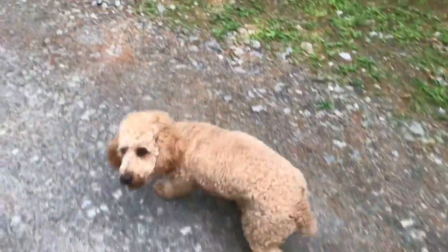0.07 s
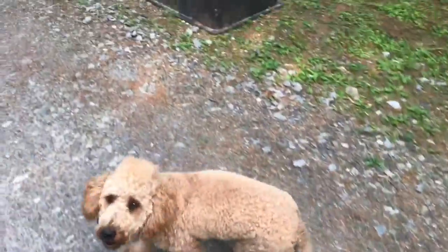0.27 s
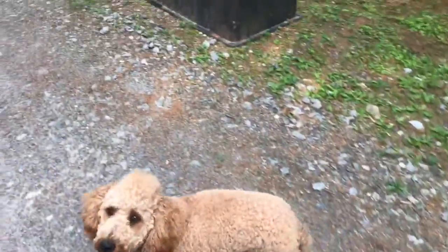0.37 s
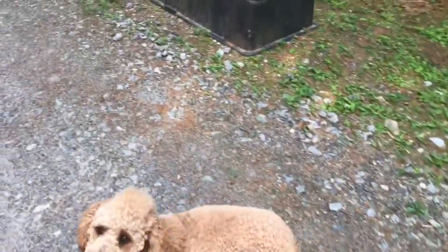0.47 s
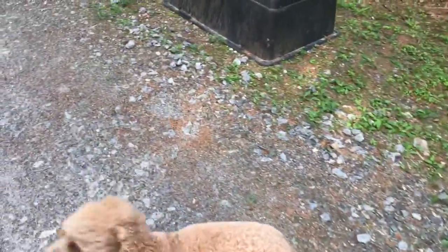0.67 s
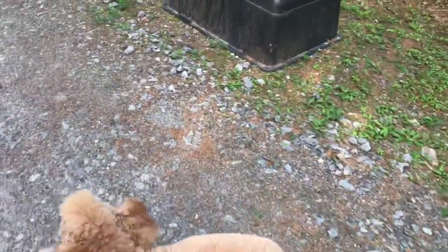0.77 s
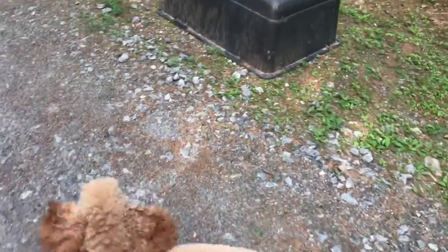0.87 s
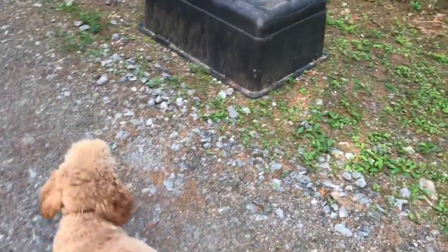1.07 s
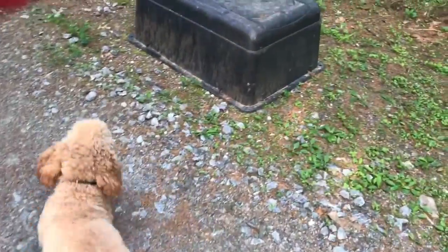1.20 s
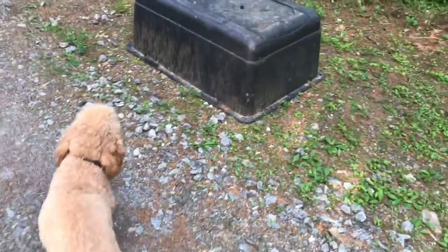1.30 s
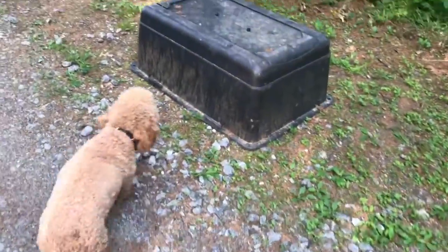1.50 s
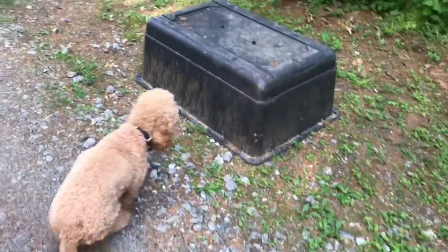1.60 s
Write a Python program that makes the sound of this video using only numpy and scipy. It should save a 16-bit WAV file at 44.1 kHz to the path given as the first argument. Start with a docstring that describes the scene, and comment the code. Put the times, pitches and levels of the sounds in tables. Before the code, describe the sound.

Slow footsteps crunch on gravel, stones knocking and grit hissing, while a small dog's metal collar tags jingle irregularly. The middle step has the sharpest stone knock. Quiet outdoor place, close, dry, mono microphone with faint low rumble.

```python
"""Three slow steps on a gravel path, beside a small dog whose three metal collar tags clink.
Soles crunch small stones (dense grains in broad bands) and knock large ones (cosine pulses plus rattle).
Stones settle and dragged grit hisses (coloured grains); tags ring as damped sine modes.
Under it lie a low rumble and faint outdoor air, both coloured noise."""
import sys
import numpy as np
from scipy import signal
from scipy.fft import rfft, irfft
from scipy.io import wavfile

SR = 44100
rng = np.random.default_rng(int(sys.argv[2]) if len(sys.argv) > 2 else 0)


def master(y):
    """Save y as 16-bit WAV."""
    cut = np.clip(np.atleast_2d(y).T, -1, 1)
    pcm = np.round(cut * 32767)  # scale
    wavfile.write(sys.argv[1], SR, pcm.astype(np.int16))


N = 72765  # samples, 1.65 s


def amp(db):
    """Decibels to linear gain."""
    return 10 ** (np.asarray(db) / 20)


def noise():
    """White Gaussian noise."""
    return rng.standard_normal(N)


def colour(x, points):
    """Shape the spectrum by (frequency [Hz], level [dB]) points; scale to rms 1."""
    hz, db = np.array(points, float).T
    log_hz = np.log(np.maximum(np.fft.rfftfreq(N, 1 / SR), 1))
    below = np.maximum(np.log(hz[0]) - log_hz, 0)
    above = np.maximum(log_hz - np.log(hz[-1]), 0)
    # 77 dB per factor e in frequency beyond the end points
    gain_db = np.interp(log_hz, np.log(hz), db) - 77 * (below + above)
    y = irfft(rfft(x) * amp(gain_db), N)
    return y / y.std()


def band(x, hz, width):
    """Broad resonance, width relative to its centre; scaled to rms 1."""
    edge = np.sqrt(1 + width ** 2 / 4) + width / 2
    edges_hz = [hz / edge, min(hz * edge, 0.45 * SR)]
    y = signal.sosfilt(signal.butter(2, edges_hz, "band", fs=SR, output="sos"), x)
    return y / y.std()


def grains(per_s, spread_db):
    """Random one-sample impacts of either sign and uneven size."""
    hits = rng.random(N) < per_s / SR
    signs = rng.choice([-1, 1], N)
    sizes = amp(spread_db * np.minimum(rng.exponential(size=N), 4))
    return hits * signs * sizes


def fade(age, tau_s):
    """Sudden start, exponential decay."""
    return (age >= 0) * np.exp(-np.maximum(age, 0) / tau_s)


def curve(t, points):
    """Gain along (time [s], level [dB]) points, linear in dB."""
    return amp(np.interp(t, *np.array(points).T))


# rumble spectrum: (frequency [Hz], relative level [dB])
RUMBLE_COLOUR = [(20, -58), (32, -7), (48, 0.5), (70, -1), (105, 1), (150, -14), (250, -18.5), (500, -22.5)]
# air spectrum: (frequency [Hz], relative level [dB])
AIR_COLOUR = [(88, -9), (150, 8.5), (759, 1.5), (1240, -20.5), (4950, -6), (9260, -34), (10200, -67.5),
              (13400, -26.5), (16000, -11)]
RUMBLE_DB, AIR_DB = -59.5, -72


def outdoors():
    """Low rumble and faint air: two steady coloured noises."""
    rumble = amp(RUMBLE_DB) * colour(noise(), RUMBLE_COLOUR)
    air = amp(AIR_DB) * colour(noise(), AIR_COLOUR)
    return rumble + air


# stones settling under the sole, scaled by the two mix levels below: (time [s], level [dB])
SETTLE = [(0, -62), (.19, -64.5), (.25, -56.5), (.38, -57), (.62, -60), (.72, -67), (.78, -64), (.85, -62),
          (.99, -52), (1.05, -53), (1.12, -60.5), (1.29, -63), (1.45, -62), (1.53, -59.5), (1.58, -61),
          (1.65, -68)]
# settling spectrum: (frequency [Hz], relative level [dB])
SETTLE_COLOUR = [(150, 5), (400, -2), (800, -2.5), (1400, 0.5), (2200, -6), (3500, -12), (8000, -49)]
STONES_MIX_DB, PEBBLES_MIX_DB = -2.0, -3.5
# grit dragged along the path: (time [s], level [dB])
GRIT = [(0, -57.5), (.11, -63), (.2, -58), (.33, -59), (.43, -59), (.52, -54), (.62, -54), (.69, -64),
        (.84, -64), (.94, -53), (1.08, -60), (1.15, -57), (1.24, -63), (1.42, -65.5), (1.49, -58.5),
        (1.56, -65), (1.65, -62)]
# grit spectrum: (frequency [Hz], relative level [dB])
GRIT_COLOUR = [(880, -48), (1500, -36), (1850, -16), (1960, -10.5), (2610, -2), (3120, -2), (5020, -5.5),
               (8740, -5.5), (10300, -8), (12500, -0.5), (16000, -17.5)]
SCUFF_PEAK_S, SCUFF_HALF_LENGTH_S, SCUFF_HZ, SCUFF_DB = 0.516, 0.07, 3440, -56


def gravel(t):
    """Stones settle, sparser pebbles tick, fine grit hisses (all grains); one foot scuffs (noise)."""
    stones = colour(grains(2500, spread_db=2.0), SETTLE_COLOUR)
    pebbles = band(grains(380, spread_db=2.5), 1410, 0.69)
    settle = curve(t, SETTLE) * (amp(STONES_MIX_DB) * stones + amp(PEBBLES_MIX_DB) * pebbles)
    grit = curve(t, GRIT) * colour(grains(7000, spread_db=4.0), GRIT_COLOUR)
    swell = np.exp(-((t - SCUFF_PEAK_S) / SCUFF_HALF_LENGTH_S) ** 2)
    scuff = amp(SCUFF_DB) * swell * band(noise(), SCUFF_HZ, 0.43)
    return settle + grit + scuff


STRIKE_SPREAD_DB = 2  # standard deviation and limit


def ring(age, modes):
    """Decaying sine modes of one tag; where it is struck varies the weaker modes."""
    out = np.zeros(N)
    for hz, db, t60_s in modes:
        strike_db = 0
        if db < 0:
            strike_db = STRIKE_SPREAD_DB * np.clip(rng.standard_normal(), -1, 1)
        tone = np.sin(2 * np.pi * (hz * age + rng.random()))
        out += amp(db + strike_db) * tone * fade(age, t60_s / np.log(1000))
    return out


# modes of each tag: (frequency [Hz], level before strike spread [dB], 60 dB decay time [s])
BIG_TAG = [(6377, 0, .16), (6410, -12, .04), (15290, -6, .04)]
MIDDLE_TAG = [(7101, 0, .17), (12170, -10, .1), (15604, -6, .1)]
SMALL_TAG = [(13730, 0, .11), (13660, -8, .05), (12750, -13, .03), (4080, -17, .03)]
# clinks: (time [s], contact level [dB], big tag level [dB], middle tag level [dB],
#          small tag level [dB], time until the tags touch and damp [s])
CLINKS = [(.028, -38.5, -62, -53, -48, 0.0092), (.035, -46, -75, -70, -45, 0.062),
          (.080, -41, -57.5, -71, -58, 0.0069), (.1236, -44, -55, -70, -74, 0.007),
          (0.1628, -45, -54, -70, -70, .01), (.2327, -30, -28, -36, -49, 0.0046),
          (0.2398, -23, -20, -31, -27, 0.0054), (.2455, -30.5, -43, -41, -35, 0.096),
          (0.2992, -48, -40.5, -64, -66, 0.0054), (0.3747, -38.5, -56, -66, -62, 0.0041),
          (0.3862, -35, -40, -47, -50, 0.0028), (0.389, -49, -61, -63, -37.5, .05),
          (0.417, -37, -58, -53, -33, 0.0078), (0.4195, -33.5, -57, -60, -38.5, 0.017),
          (.441, -45, -56, -65, -55, 0.027), (0.4797, -47, -56, -64, -49, 0.016),
          (.5788, -29.5, -37.5, -42.5, -26.5, 0.0052), (.590, -67, -78, -77, -48, .04),
          (0.7, -41, -58, -63, -39.5, 0.011), (0.7311, -38.5, -64, -74, -65, 0.0032),
          (.7871, -46, -68, -63, -54, 0.004), (0.9271, -33.5, -40, -48, -33, 0.0088),
          (.936, -29.5, -35, -45, -39, 0.046), (.9765, -48, -41, -43, -33, 0.0045),
          (.982, -44, -42, -51, -61, 0.012), (1.0131, -58, -57, -64, -50, 0.03),
          (1.0412, -43.5, -36.5, -64, -55, 0.019), (1.067, -57, -42.5, -56, -66, .012),
          (1.11, -61, -56, -70, -72, 0.025), (1.1371, -39, -58, -66, -55, 0.017),
          (1.1862, -44, -57.5, -68, -55, 0.0066), (1.292, -48.5, -61, -70, -70, 0.0046),
          (1.3264, -56, -48.5, -70, -69, 0.032), (1.345, -68, -47, -68, -72, 0.0067),
          (1.364, -39, -64, -68, -53, 0.007), (1.3679, -46, -53, -59, -40, 0.022),
          (1.398, -46.5, -53, -60, -55, 0.021), (1.426, -62, -54, -60, -59, 0.016),
          (1.4782, -38, -53, -57, -45, 0.0058), (1.507, -42, -45, -64, -64, 0.0072),
          (1.5876, -44, -60, -68, -47, 0.015)]
# contact noise spectrum: (frequency [Hz], relative level [dB])
CONTACT_COLOUR = [(1500, -3), (3000, -4.5), (4000, 4.5), (5200, -7), (6600, -6.5), (8200, 7.5),
                  (10500, -2.5), (12700, 9), (14500, -14), (15400, -7.5), (16500, 5)]
CONTACT_TAU_S, BOUNCE_DELAY_S, BOUNCE_DB, DAMPED_TAU_S = 0.0013, 0.0024, -8.5, 0.0023


def tags(t):
    """Contact noise with one bounce; modes ring until the tags lie against each other."""
    out = np.zeros(N)
    scrape = colour(noise(), CONTACT_COLOUR)
    for start, contact_db, big_db, middle_db, small_db, free_s in CLINKS:
        age = t - start
        bounce = amp(BOUNCE_DB) * fade(age - BOUNCE_DELAY_S, CONTACT_TAU_S)
        contact = fade(age, CONTACT_TAU_S) + bounce
        damping = np.exp(-np.maximum(age - free_s, 0) / DAMPED_TAU_S)
        rings = amp(big_db) * ring(age, BIG_TAG)
        rings += amp(middle_db) * ring(age, MIDDLE_TAG)
        rings += amp(small_db) * ring(age, SMALL_TAG)
        out += amp(contact_db) * contact * scrape + damping * rings
    return out


# loose stones knocking: (time [s], peak level before high-pass [dB], pitch [Hz], half length [cycles])
KNOCKS = [(0.128, -45, 880, .7), (0.2601, -38, 1180, 0.67), (0.305, -46, 1370, 1.5),
          (0.354, -38.5, 1300, 0.59), (0.9088, -19.5, 2170, 0.58), (0.924, -11, 1814, 0.45),
          (.9583, -24, 1240, 0.73), (.9648, -23.5, 1420, .8), (.9768, -52, 1600, 0.73),
          (1.040, -37, 1280, 1.15), (1.241, -41.5, 1870, 1.04), (1.287, -40, 1570, 0.6),
          (1.4146, -29, 1690, 0.67), (1.4717, -35, 1240, 0.84), (1.4836, -25.5, 1060, 0.74),
          (1.4885, -30, 1310, 0.2), (1.4919, -30, 1140, 0.51), (1.515, -27, 1740, 0.83),
          (1.536, -36, 1720, 0.89), (1.551, -34.5, 1590, .6)]
RATTLE_REL_DB, RATTLE_TAU_S, KNOCK_HIGHPASS_HZ = -23.5, 0.0029, 420


def knocks(t):
    """Bedded stones knock for about one cycle and rattle their neighbours."""
    out = np.zeros(N)
    for start, db, hz, half_cycles in KNOCKS:
        cycles = (t - start) * hz
        knock = np.cos(2 * np.pi * cycles) * np.exp(-(cycles / half_cycles) ** 2)
        rattle = band(noise(), hz, 0.94) * fade(t - start, RATTLE_TAU_S)
        out += amp(db) * (knock + amp(RATTLE_REL_DB) * rattle)
    return signal.sosfilt(signal.butter(2, KNOCK_HIGHPASS_HZ, "high", fs=SR, output="sos"), out)


# heel and sole pressing the gravel: (time [s], time until release [s], crunch level [dB],
#     crunch centre [Hz], fine grit re crunch [dB], thud re crunch [dB])
STEPS = [(0.209, 0.013, -44.5, 990, -7.5, -6.5), (0.771, 0.017, -58.5, 990, 1, -14),
         (0.882, 0.025, -45, 1480, -17, -20), (0.946, 0.031, -44, 1190, -24, -20),
         (1.471, 0.023, -38.5, 1190, -9.5, -9), (1.509, 0.0077, -43, 1100, -12, -6.5)]
CRUNCH_ATTACK_S, CRUNCH_RELEASE_TAU_S, CRUNCH_GRAINS_PER_S, CRUNCH_REL_WIDTH = 0.0072, 0.0067, 2600, 0.89
THUD_HZ = 340


def steps(t):
    """Heel and sole each crush a patch of stones, with a soft thud of the ground."""
    out = np.zeros(N)
    for start, length_s, db, hz, grit_db, thud_db in STEPS:
        age = t - start
        release = np.exp(-np.maximum(age - length_s, 0) / CRUNCH_RELEASE_TAU_S)
        press = np.clip(age / CRUNCH_ATTACK_S, 0, 1) * release
        stones = grains(CRUNCH_GRAINS_PER_S, spread_db=1.5)
        crunch = band(stones, hz, CRUNCH_REL_WIDTH)
        fine_grit = amp(grit_db) * band(stones, 2140, 0.82)
        thud = amp(thud_db) * band(noise(), THUD_HZ, 1.3)
        out += amp(db) * press * (crunch + fine_grit + thud)
    return out


def scene():
    """Sum of all layers, one channel, no reverberation."""
    t = np.arange(N) / SR
    return (steps(t) + knocks(t) + tags(t) + gravel(t) + outdoors())[None]


TOP_HZ = 15900


def record(dry):
    """Steep elliptic low-pass cuts the top."""
    return signal.sosfilt(signal.ellip(8, 0.2, 70, TOP_HZ, fs=SR, output="sos"), dry)


dry = scene()
out = record(dry)
master(out)
```